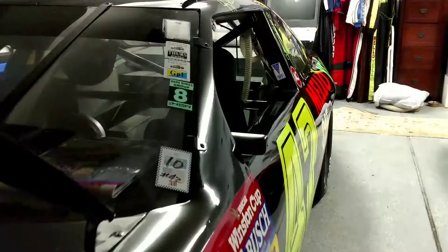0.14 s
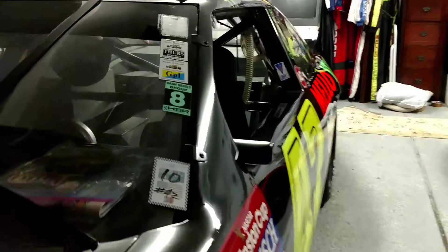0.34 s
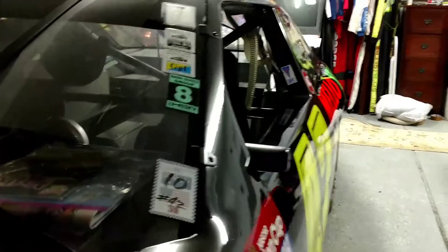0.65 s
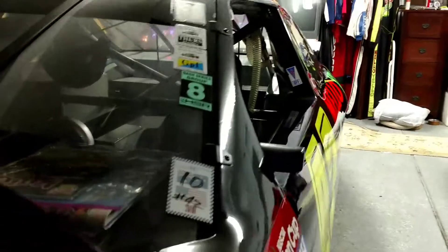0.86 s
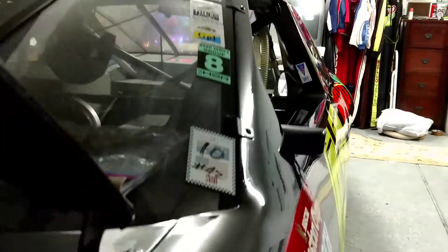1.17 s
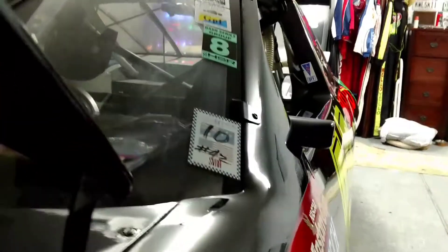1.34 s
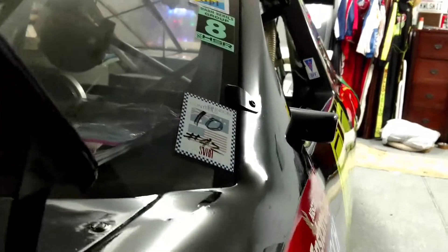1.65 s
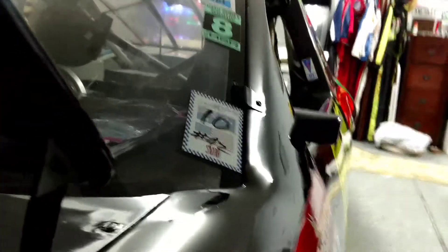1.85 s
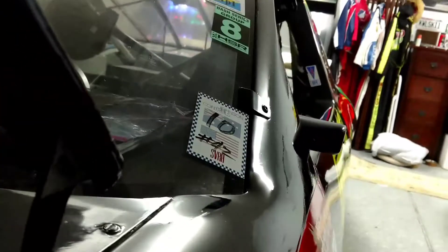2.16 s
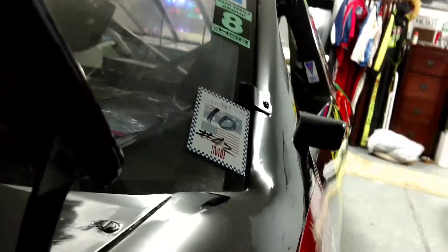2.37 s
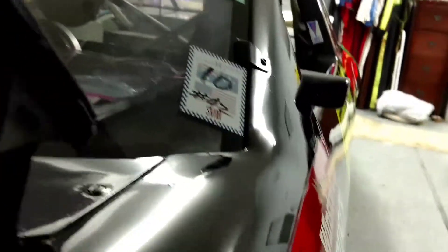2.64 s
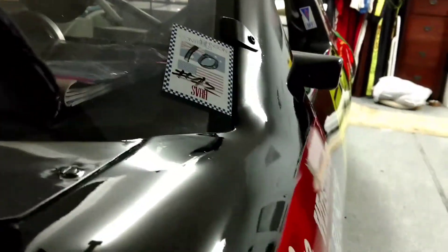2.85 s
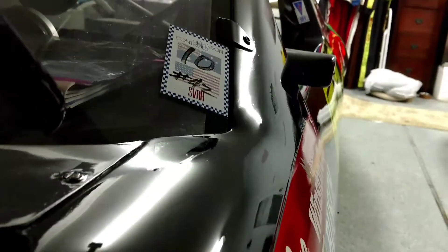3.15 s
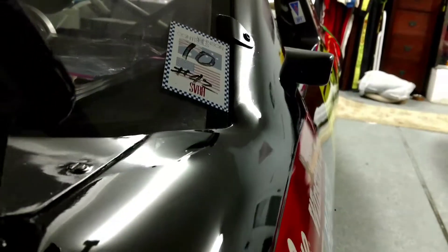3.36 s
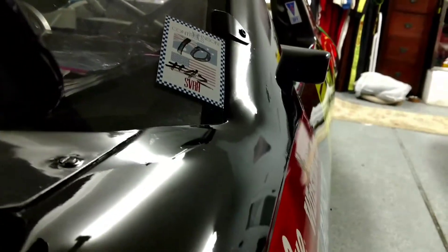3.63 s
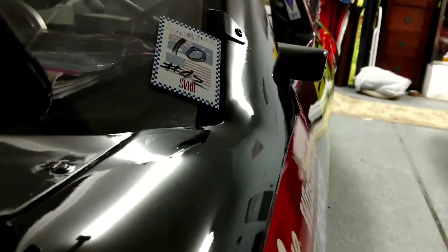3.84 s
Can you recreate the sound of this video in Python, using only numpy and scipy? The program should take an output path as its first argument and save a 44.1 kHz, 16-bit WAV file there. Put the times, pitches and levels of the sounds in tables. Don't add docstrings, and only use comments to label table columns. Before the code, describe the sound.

A loud race car engine idles with an uneven, lumpy lope inside a reverberant garage.

```python
import sys
import numpy as np
from scipy import signal
from scipy.fft import rfft, irfft
from scipy.io import wavfile

SR = 44100
rng = np.random.default_rng(int(sys.argv[2]) if len(sys.argv) > 2 else 0)


def store_pcm(level_fs):
    pcm = np.round(np.clip(level_fs, -1, 1) * 32767).astype(np.int16)
    wavfile.write(sys.argv[1], SR, np.atleast_2d(pcm).T)


def boost(x):
    u = np.asarray(x, float) / 20
    return 10 ** u


N = 176400


def evened(x):
    return x / np.sqrt(np.mean(x ** 2) + 1e-20)


def read(points, hz):
    f, value = np.transpose(points)
    return np.interp(np.log(hz + 1), np.log(f + 1), value)


def clicks(times, sizes):
    out = np.zeros(N)
    np.add.at(out, np.clip((times * SR).astype(int), 0, N - 1), sizes)
    return out


def causal(points):
    hz = np.abs(np.fft.fftfreq(16384, 1 / SR))
    log_gain = np.log(boost(read(points, hz)))
    return np.fft.ifft(np.exp(np.conj(signal.hilbert(log_gain)))).real[:6000]


def burst(samples, rise_s, fall_s):
    t = np.arange(samples) / SR
    return (1 - np.exp(-t / rise_s)) * np.exp(-t / fall_s)


# [t/s, level/dB, throttle share 0-1]
EFFORT = [(.31, -37, 0), (.42, -26, 0.41), (.55, -23, 0), (.68, -21.5, 0.1), (.92, -26.5, 0),
          (1.24, -22, 0), (1.45, -29.5, 0.1), (1.66, -25, 0.22), (1.9, -24, 0.26), (2.32, -24, 0),
          (2.65, -27, 0), (2.91, -24.5, 1), (3.17, -25, 0.18), (3.34, -23, 0.44), (3.55, -21.5, 0.47),
          (3.72, -21.5, 0.87), (3.9, -30.5, 0.7), (4.0, -19, 0.67)]


def idle():
    firings_per_s, jitter, uneven_db = 62, 0.2487, 3
    rumble_db, rush_db, throttle_db = -3, -7.5, 4
    gated = 0.54
    t = np.arange(N) / SR
    s, level_db, throttle = np.transpose(EFFORT)
    level = boost(np.interp(t, s, level_db))
    throttle = np.interp(t, s, throttle)

    chance = rng.standard_normal((400, 2))
    times = (np.arange(400) + jitter * chance[:, 0]) / firings_per_s
    sizes = boost(uneven_db * chance[:, 1]) * (times < N / SR)
    train = clicks(times, sizes)
    gate = evened(signal.fftconvolve(train, burst(2000, .003, .0088))[:N])

    noise = rng.standard_normal((4, N))
    low = evened(0.48 * evened(train) + gate * noise[:2])
    rush = evened((1 - gated + gated * gate) * noise[2:])
    return level * low * boost(rumble_db + throttle_db * throttle), level * boost(rush_db) * rush


# [t/s, boom level/dB, crack level/dB]
PUFFS = [(0.43, -28, -28), (0.472, -27, -26.5), (0.743, -12, -16), (0.77, -11.5, -15.5),
         (0.869, -21.5, -49), (1.028, 0.5, -22), (1.208, -13.5, -21.5), (1.32, -16, -21.5),
         (1.377, -21, -35), (1.618, -22, -40), (1.799, -19, -22), (1.957, -17, -15.5), (2.02, -25.5, -40),
         (2.247, -16, -32), (2.437, -33, -54), (2.532, -7, -21.5), (2.617, -21.5, -43), (2.831, -18.5, -19),
         (2.939, -13, -17), (3.101, -19.5, -20.5), (3.137, -19, -34), (3.351, -15, -22),
         (3.491, -12, -13.5), (3.52, -11.5, -31), (3.601, -9, -27), (3.694, -12, -35), (3.765, -19, -39),
         (3.864, -7, -28), (3.985, -16, -19)]


def soft_puffs():
    s, boom_db, soft_crack_db = np.transpose(PUFFS)
    return clicks(s, boost(boom_db - 11.5)), clicks(s, boost(soft_crack_db - 3))


# [t/s, crack level/dB, boom level/dB]
HARD = [(0.534, -20, -26), (0.596, -17, -5), (0.66, -16.5, -22), (0.815, -17.5, -11), (0.9556, -13.5, -21),
        (1.0854, -16.5, -22), (1.1606, -11.5, -20.5), (1.2558, -13, -4.5), (1.4845, -23, -33),
        (1.5764, -18.5, -25.5), (1.6818, -13, -3.5), (1.7599, -15.5, -20.5), (1.8618, -12.5, -17),
        (1.9207, -15, -13.5), (2.105, -16, -6.5), (2.2127, -17.5, -21), (2.3195, -14, -9),
        (2.3778, -18, -22), (2.4143, -16, -28), (2.7069, -15, -20), (2.7796, -15, -8.5), (2.8714, -15, -27),
        (2.9716, -21.5, -7), (3.0543, -18.5, -22), (3.205, -18, -9), (3.2908, -11, -38),
        (3.395, -13.5, -18), (3.443, -15.5, -10.5), (3.5904, -21.5, -15), (3.627, -17.5, 0)]


def hard_firings():
    s, crack_db, boom_db = np.transpose(HARD)
    return clicks(s, boost(boom_db - 2.5)), clicks(s, boost(crack_db - 2.5))


def blows_and_cracks():
    soft_boom, soft_crack = soft_puffs()
    hard_boom, crack = hard_firings()
    noise = rng.standard_normal((4, N))
    boom = hard_boom + soft_boom
    blow = signal.fftconvolve(boom, burst(6000, .003, .0088))[:N]
    gas = signal.fftconvolve(crack + soft_crack, burst(6000, .004, .021))[:N]
    return 7 * boom + 6 * blow * noise[:2], gas * noise[2:]


# [f/Hz, width/Hz, level/dB]
PIPE = [(75, 20, -6), (106, 12, 8), (143, 15, 6), (177, 12, 7), (221, 16, -2), (254, 18, 2), (290, 26, 0),
        (378, 18, 3), (404, 15, 8), (432, 16, 5), (633, 20, 2), (776, 30, -2), (1031, 26, 0),
        (1174, 28, -1)]
# [f/Hz, level/dB]
BOOM = [(25, -18), (55, -6), (90, 6.5), (300, 1), (800, -4.5), (1500, -12.5), (2500, -14.5), (6000, -34)]


def pipe(x, tune):
    t = np.arange(8000) / SR
    tone = np.zeros(8000)
    for hz, width, db in PIPE:
        ring = np.exp(-np.pi * width * t) * np.cos(2 * np.pi * hz * tune * t)
        tone += boost(db) * 2 * np.pi * width / SR * ring
    tone[0] += boost(-5)
    tone = signal.fftconvolve(tone, causal(BOOM))
    return signal.fftconvolve(x, tone[None] / np.linalg.norm(tone), axes=1)[:, :N]


def two_pipes(low):
    detune, swap_per_s = .006, 2.3
    swap = 2 * np.pi * swap_per_s * np.arange(N) / SR
    return pipe(low * np.cos(swap), 1 - detune) + pipe(low * np.sin(swap), 1 + detune)


# [f/Hz, level/dB]
HISS = [(200, -32), (600, -6.5), (1600, -2), (3000, -5.5), (5300, -3), (9000, -3.5), (12000, -8),
        (15500, -10)]


def open_hiss(rush, cracks):
    rush = signal.lfilter(*signal.butter(1, 7300, fs=SR), rush)
    gas = causal(HISS)
    return signal.fftconvolve(rush + cracks, gas[None] / np.linalg.norm(gas), axes=1)[:, :N]


# [f/Hz, t60/s]
GARAGE = [(100, 0.53), (400, 0.85), (1500, 0.43), (5000, 0.44), (12000, 0.62)]


def garage(x, wet_db, turns_per_s):
    taps = np.zeros((3, 2, SR))
    at = np.arange(120, SR - 20, 20)
    at = at + rng.integers(0, 20, (3, 2, len(at)))
    np.put_along_axis(taps, at, rng.choice([-1., 1.], at.shape), 2)

    hz, t, z = signal.stft(taps, SR, nperseg=512)
    decay = boost(-60 * t / read(GARAGE, hz)[:, None])
    tail = signal.istft(z * decay, SR, nperseg=512)[1]
    tail = boost(wet_db) * tail / np.linalg.norm(tail, axis=2)[..., None]

    turn = 2 * np.pi * (turns_per_s * np.arange(N) / SR + np.arange(3)[:, None, None] / 3)
    sent = x * np.sqrt(2 / 3) * np.cos(turn)
    wet = signal.fftconvolve(sent, tail, axes=2)[..., :N].sum(0)
    return (x + wet) / np.sqrt(1 + boost(2 * wet_db))


def scene():
    low, rush = idle()
    blows, cracks = blows_and_cracks()
    boom = two_pipes(low + blows)
    hiss = open_hiss(rush, cracks)
    return garage(boom, wet_db=-3, turns_per_s=.9) + garage(hiss, wet_db=2, turns_per_s=5)


# [f/Hz, level/dB]
SIDE_TILT = [(25, 10), (60, -3), (150, -1), (400, -8), (800, -3.5), (1600, 0.5), (4000, -0.5), (12000, 0.5)]
# [f/Hz, share 0-1]
CROSS = [(300, .3), (1100, .9), (2150, .95), (3250, .9), (4350, .8), (5450, .66), (6500, .5), (9000, .1)]
# [f/Hz, share 0-1]
TIE = [(30, .95), (80, 1), (170, 0.97), (300, .6), (600, 0.13), (1500, 0.05), (7000, 0.52), (13000, 0.51)]
# [f/Hz, turn/rad]
TIE_TURN = [(30, 1.4), (80, 2), (300, 2.73), (600, 3.9), (1500, 0.52), (5000, 0.15), (9000, 0.25),
            (12500, 2.4)]


def camera_ports(dry):
    cross_s = 20.3 / SR
    hz = np.fft.rfftfreq(N, 1 / SR)
    mid, other = rfft(dry)
    tie = np.clip(read(TIE, hz), 0, 1)
    tied = tie * np.exp(1j * read(TIE_TURN, hz)) * mid
    side = boost(read(SIDE_TILT, hz)) * (tied + np.sqrt(1 - tie ** 2) * other)
    late = np.clip(read(CROSS, hz), 0, 1) * np.exp(-2j * np.pi * hz * cross_s)
    mid = irfft(mid * (1 - late), N)
    side = irfft(side * (1 + late), N)
    return np.array([mid + side, mid - side])


def low_pass(x):
    return signal.sosfilt(signal.butter(12, 16470, fs=SR, output="sos"), x)


def record(dry):
    start_s, rise_s, ceiling, edge_hz = .311, .006, 1.3, 15560
    start = np.clip((np.arange(N) / SR - start_s) / rise_s, 0, 1)
    ports = ceiling * np.tanh(start * camera_ports(dry) / ceiling)
    mix = irfft(rfft(ports) * (np.fft.rfftfreq(N, 1 / SR) < edge_hz), N)
    return low_pass(mix)


dry = scene()
out = record(dry)
store_pcm(out)
```